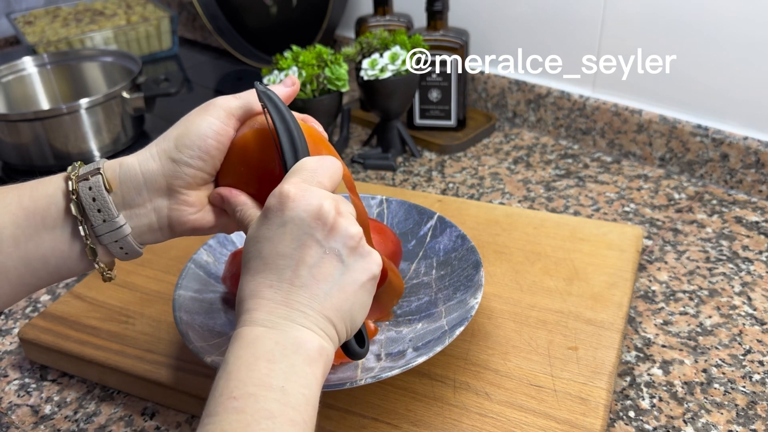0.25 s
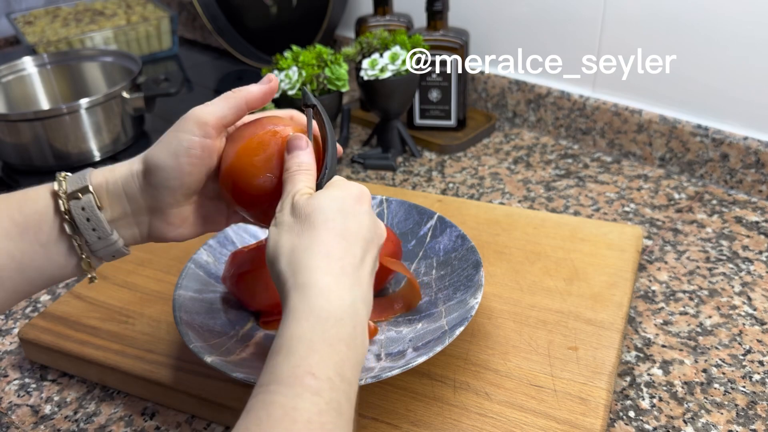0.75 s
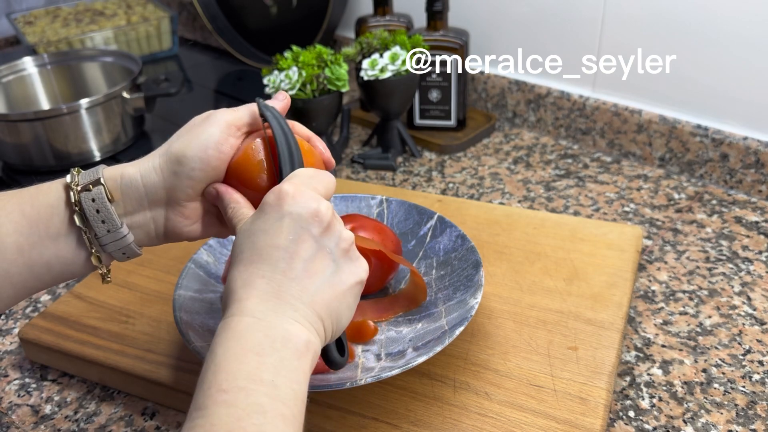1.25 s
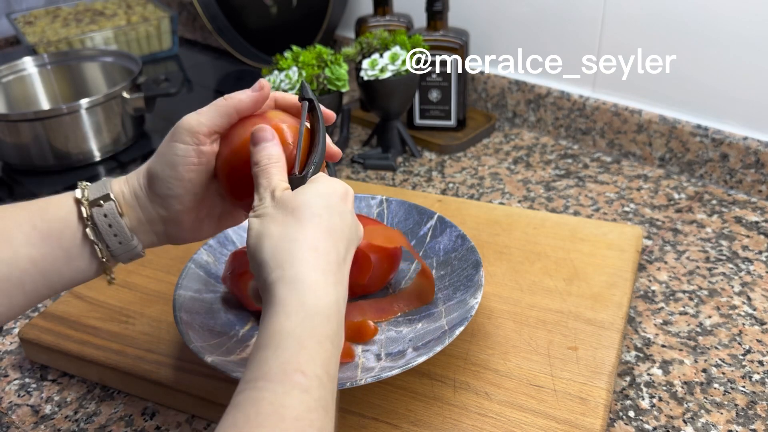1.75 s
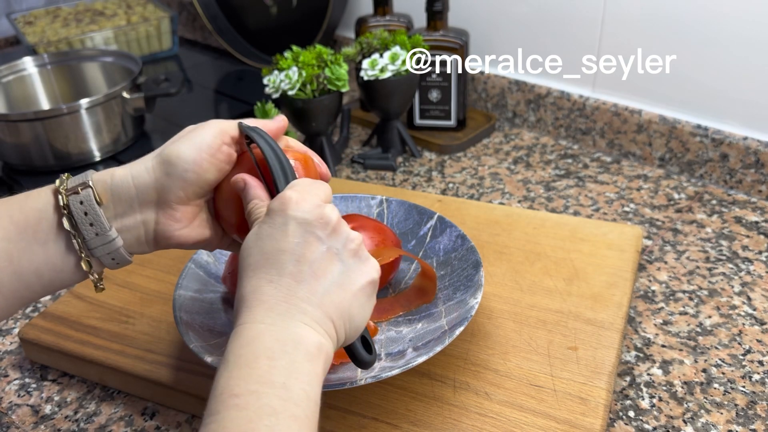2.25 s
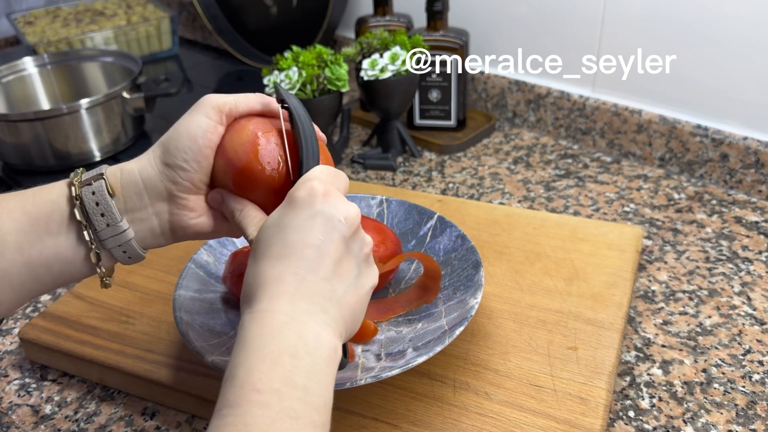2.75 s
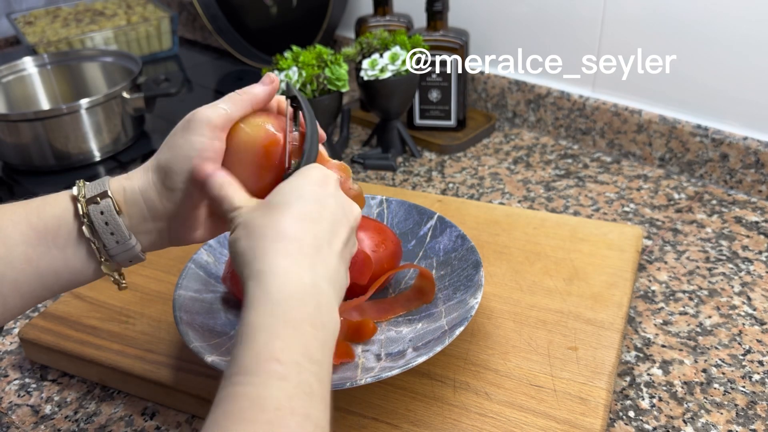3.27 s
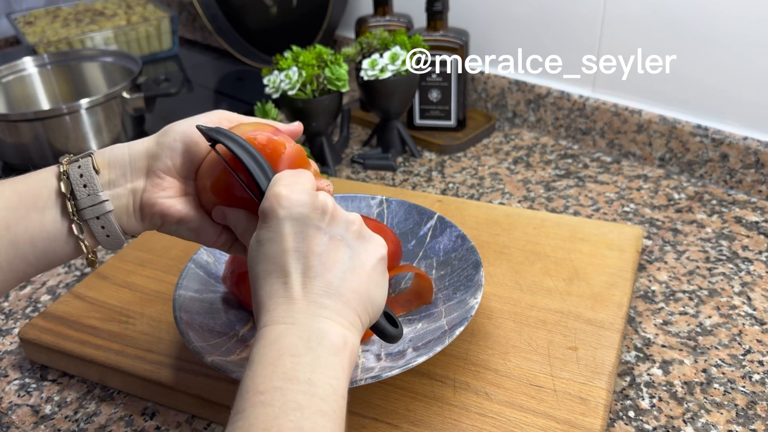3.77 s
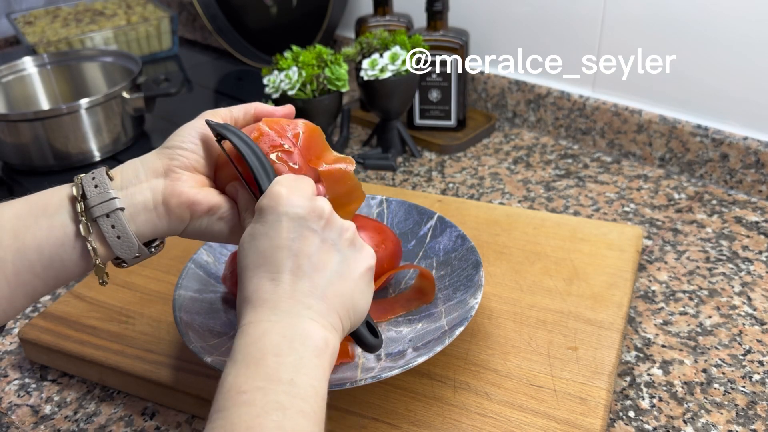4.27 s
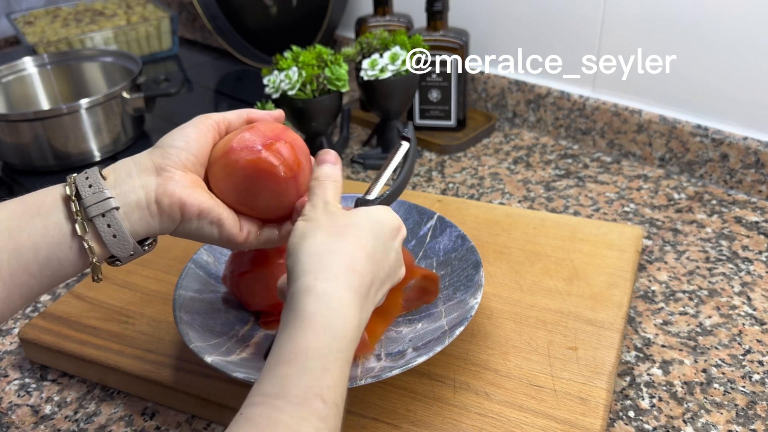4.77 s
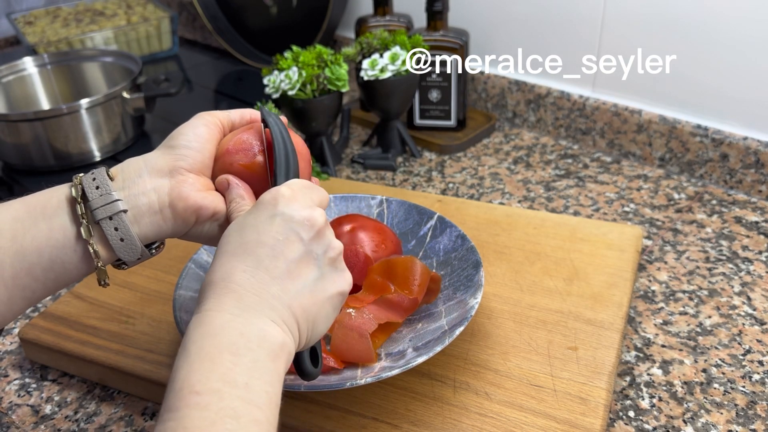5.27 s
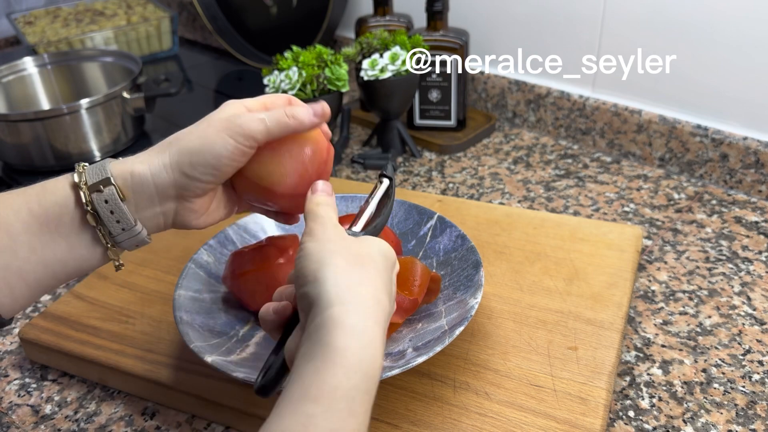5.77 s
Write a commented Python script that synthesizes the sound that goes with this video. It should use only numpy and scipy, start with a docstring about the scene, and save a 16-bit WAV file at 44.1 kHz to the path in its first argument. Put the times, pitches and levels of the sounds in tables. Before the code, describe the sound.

Close to the microphone in a small tiled kitchen, a peeler tears tomato skin in short, soft rasps with wet pops and thin squeaks. Its loose blade ticks lightly. Past the middle it slips off with one hard snap, and peel slaps onto a plate. A few more strokes follow, then something further off squeals and thuds dully. A low appliance hum and airy hiss continue underneath.

```python
"""A peeler tears the skin of a tomato, each stroke a dense run of tiny ruptures with wet pops and squeaks.
The swivel blade ticks in its holder and once snaps hard as it slips off the fruit; peel slaps the plate.
All this is close to a phone in a small tiled kitchen. Near the end something further off squeals and
thuds dully against a panel. Underneath sits a bed of appliance hum, air and a faint electrical whine."""
import sys
import numpy as np
from scipy import signal
from scipy.fft import rfft, irfft
from scipy.io import wavfile

SR = 44100
rng = np.random.default_rng(int(sys.argv[2]) if len(sys.argv) > 2 else 0)


def unload_audio(sound):
    """Save the sound as a 16-bit wav file, at the path given as the first command line argument."""
    columns = np.transpose(np.atleast_2d(sound))
    # keep every value between -1 and 1, then stretch to whole-number steps
    steps = np.round(np.clip(columns, -1, 1) * 32767)
    wavfile.write(sys.argv[1], SR, steps.astype(np.int16))


N = 265482
T = np.arange(N) / SR
FREQ = np.arange(N + 1) * SR / (2 * N)

# Table levels are trims ahead of the layer and mix gains.
# blade strokes: cut start t/s, dig-in/s, hold/s, rasp level/dB, flesh re rasp/dB, buzz re rasp/dB
STROKES = [ (0.456, 0.0054, 0.0037, -52, 2, -3), (0.495, 0.0031, 0.0079, -56, 3, 1.5),
           (1.143, 0.017, 0.012, -50.5, 1, -6.5), (1.161, .005, 0.009, -53, 3.5, -2.5),
           (1.195, .014, 0.014, -50.5, 0, -4), (1.22, .008, 0.017, -52.5, -5, -5.5),
           (1.270, 0.024, 0.011, -54.5, 3, -2.5), (1.340, .020, 0.1, -63, 0, -5),
           (1.45, 0.011, 0.012, -51.5, 0, -4.5), (2.041, 0.037, 0.043, -54, -2.5, -2.5),
           (2.173, 0.01, 0.0031, -46, -5.5, -6.5), (2.212, .009, 0.046, -59.5, 0, -2),
           (2.657, 0.0028, .004, -54, -5.5, -10), (2.682, 0.0026, 0.0044, -52.5, -8, -4),
           (2.776, 0.014, 0.017, -48, -1.5, -11), (2.807, .008, 0.016, -49, -3, -10),
           (2.835, .006, 0.013, -47, -3, -10), (2.857, .008, 0.02, -50.5, 0, -10),
           (2.886, 0.024, 0.02, -46, -2, -2.5), (2.942, .005, 0.012, -54.5, -13, -9),
           (3.595, .020, 0.11, -64, -2.5, -9), (3.708, 0.011, 0.019, -56.5, 1.5, -2.5),
           (3.744, 0.0044, 0.009, -57, 4.5, 0), (3.764, .008, 0.032, -60, 6, 2.5),
           (4.211, 0.0057, 0.01, -42, -8, -4.5), (4.237, 0.015, 0.02, -46, -2, -2.5),
           (4.476, 0.012, 0.027, -57.5, -10, -1.5), (5.047, 0.0023, 0.0087, -62, -25, 10.5),
           (5.228, 0.002, 0.0045, -50, 5, 0.5), (5.265, .012, 0.023, -60.5, 3, -5),
           (5.345, 0.015, 0.037, -44.5, -5.5, -1), ]
# bright rasp of tearing skin: f/Hz, level/dB
SKIN_EQ = [(1500, -48), (3200, -4), (4500, -2.5), (5400, 1.5), (6400, 6), (7400, 2), (8400, -7.5),
           (9700, -1), (11000, 1.5), (12200, -45), (15000, -21)]
# wet flesh under the blade: f/Hz, level/dB
FLESH_EQ = [(60, -34), (150, -47), (450, 10), (650, 3.5), (850, 5.5), (1000, 1), (1280, 4), (1750, -6.5),
            (2600, -56), (5000, -20)]
# blade squeaks on smooth skin: centre t/s, half length/s, f/Hz, glide/(Hz/s), level/dB
SQUEAKS = [(0.455, 0.0091, 6250, 0, -61), (0.5, 0.014, 5580, -6000, -55.5),
           (1.181, .05, 5650, -11000, -60.5), (1.278, 0.019, 4580, -3000, -57.5),
           (1.385, 0.074, 4430, 0, -64.5), (1.46, 0.013, 4380, 0, -48), (1.488, 0.013, 4560, 4000, -66),
           (2.074, 0.021, 6600, 0, -61), (2.2, 0.087, 7050, 0, -72), (2.861, 0.055, 4730, -4000, -63),
           (2.899, 0.025, 6000, -6000, -53), (3.645, 0.045, 6400, -4000, -72), (3.709, 0.016, 5800, 0, -63),
           (3.755, 0.035, 5350, 0, -66), (3.779, 0.037, 3710, -500, -59.5), (5.36, 0.022, 7640, 0, -51.5)]
# wet pops in the strokes, the plop of landing peel, the ping of one blade tick: t/s, f/Hz, level/dB
POPS = [(1.158, 1140, -38), (2.042, 2160, -50), (2.081, 2130, -43), (2.177, 1240, -42), (2.179, 2550, -43),
        (2.68, 3100, -41), (3.748, 1180, -49), (4.475, 3130, -47), (4.496, 2300, -45), (4.507, 2200, -36.5),
        (4.567, 500, -38), (4.568, 950, -34), (4.661, 3180, -32), (5.231, 2460, -35)]
# light blade ticks: t/s, level/dB, knock re tick/dB
TICKS = [(1.116, -50, -9), (1.429, -59, 5), (1.451, -55.5, 10), (1.802, -56.5, -1), (2.508, -49, -5.5),
         (2.6537, -45, -13), (2.678, -61, -7), (2.8935, -54, 2), (3.0003, -26, -38), (3.899, -47.5, -13.5),
         (4.2121, -48.5, 1), (4.532, -51, -18), (4.6615, -35.5, -11.5), (4.701, -53, 2), (4.743, -62, 4),
         (4.85, -58, 0.5), (4.891, -61, 1.5), (5.045, -40, -8), (5.061, -49, 0.5), (5.505, -53, -7),
         (5.576, -48, -5.5)]
# bright edge of a tick: f/Hz, level/dB
EDGE_EQ = [(2000, -38), (4500, -21.5), (6300, -19), (8000, 1), (10000, 5.5), (12000, -8), (15000, -17)]
# knock of the plastic holder: f/Hz, level/dB
HOLDER_EQ = [(100, -26), (500, 1), (1200, -13), (2300, -0.5), (3200, 2.5), (4500, -7.5), (6500, 1),
             (9000, -59)]
# the hard snap and its rebounds: t/s, level/dB
SNAPS = [(4.5425, -1.5), (4.5442, 1), (4.547, -21)]
# peeler resonances, the widest being the damped holder: f/Hz, width/Hz, level/dB
PEELER_MODES = [(456, 41, -15), (526, 44, -22), (557, 38, -7), (760, 51, 3.5), (927, 73, -2),
                (1150, 79, -13), (1247, 54, 2), (1331, 42, 0), (1630, 57, -19), (1800, 90, 0),
                (1990, 56, -1), (2100, 26, -17), (2463, 150, 21.5), (2438, 51, 7), (3240, 49, 2),
                (3465, 59, 0), (3620, 52, -4.5), (4236, 32, 0.5), (4340, 68, 0.5), (4500, 34, -13),
                (4860, 40, -2), (5224, 56, 0), (5930, 31, -8), (6400, 47, 5), (6240, 41, -12),
                (6820, 36, -10), (7500, 71, 0), (7600, 58, 4.5), (7670, 20, -8), (9060, 130, 5),
                (10440, 106, 2)]
# crack of the snap: f/Hz, level/dB
CRACK_EQ = [(40, -20), (100, 15), (180, 5.5), (300, 0), (600, -3), (1300, -2), (2500, -1), (4000, -9),
            (7000, -3), (8200, -37), (11000, -39), (15000, -35)]
# loose blade rattling in its holder: f/Hz, level/dB
RATTLE_EQ = [(250, -19), (650, 1), (950, -5), (1300, 2), (1600, -3), (1900, 1), (2500, -15), (3400, -9),
             (5500, -1), (8000, -34)]
# peel landing on the plate: t/s, level/dB
SLAPS = [(4.548, -30.5), (4.567, -27.5), (4.58, -39), (4.592, -45)]
# soft body of a slap: f/Hz, level/dB
SLAP_EQ = [(90, 3), (180, -10), (360, 7), (540, 12), (850, -12), (1500, -14), (3000, -48)]
# the fruit shifting in the fingers: centre t/s, half length/s, level/dB
GRIPS = [(0.756, 0.028, -55), (1.206, 0.084, -78), (1.977, 0.069, -50.5), (2.715, 0.046, -70),
         (4.994, 0.05, -66)]
# dull rub of the hand: f/Hz, level/dB
PALM_EQ = [(80, -33), (160, 7.5), (320, 8), (500, -7), (1200, -33), (2500, -31)]
# far thud and its rattle: t/s, knock level/dB, panel level/dB, panel tilt/(dB/octave)
THUDS = [(5.704, -6, 1.5, 0), (5.722, -1, -1, 4), (5.74, -10, -11, -11), (5.761, -7, -6, -1),
         (5.772, -10, -11, 2), (5.788, -5, -11, 1), (5.807, -12, -16, -8), (5.984, -18, -15.5, -7)]
# body of the thud: f/Hz, level/dB
THUD_EQ = [(70, -6), (140, 7), (300, -3), (450, -4), (630, 3), (830, -13), (1100, -3), (1500, -18),
           (2100, -37), (4000, -49)]
# resonances of the shaken panel: f/Hz, width/Hz, level/dB
PANEL_MODES = [(255, 25, 1.5), (308, 26, -4.5), (450, 33, -3), (587, 36, 1.5), (655, 41, -20),
               (920, 48, -5.5), (1085, 32, -10), (1296, 34, -11), (1500, 50, -16)]
# far squeals of something rubbing as it is pushed: centre t/s, half length/s, f/Hz, glide/(Hz/s), level/dB
SQUEALS = [(1.955, .04, 1120, 0, -29), (5.686, 0.018, 1115, 0, -17), (5.721, 0.015, 584, -2000, -1),
           (5.737, 0.017, 303, -500, 2.5)]
# appliance hum partials: f/Hz, level/dB
HUM_PARTIALS = [(43.5, -66), (62.5, -64.5), (90.3, -59), (100, -53.5), (109.8, -69), (150.8, -76),
                (243, -80.5), (299.8, -70)]
# steady kitchen air: f/Hz, level/dB
AIR_EQ = [(18, -35), (35, -12), (50, -10.5), (85, 3.5), (125, -7), (190, -7), (290, -12), (600, -13),
          (850, -19), (1100, -26), (1550, -25.5), (1900, -31), (5000, -33.5), (6300, -32.5), (8600, -40.5),
          (10200, -35.5), (12000, -39.5), (15000, -46.5)]
# first echoes off board, plate and wall: left delay/s, right delay/s, level/dB
ECHOES = [(.0011, 0.0052, -21), (.0031, 0.0011, -37), (.0046, .0058, -56)]
# reverb send of the snap and slaps: f/Hz, level/dB
HIT_SEND_EQ = [(200, 3), (420, -2.5), (800, 2), (1400, 4), (1950, 1.5), (2250, -5), (2500, -8), (2900, -5),
               (3500, 3.5), (5250, -2), (6400, -3), (8000, 3)]
# width of diffuse sound: f/Hz, side re mid/dB
DIFFUSE_WIDTH = [(60, -30), (110, -10.5), (200, -13), (370, -5), (670, 1.5), (1200, 2), (2200, -9),
                 (4000, -4.5), (6500, -36), (15000, 7)]
# pan of the hands: f/Hz, left minus right/dB
HANDS_PAN = [(200, 4), (400, -1), (700, -2), (1200, 2.5), (2300, -1), (4200, -1.5), (6500, -2), (9000, 0)]
# pan of the snap and slaps: f/Hz, left minus right/dB
HIT_PAN = [(200, -2), (370, -2), (670, 7), (1220, -4), (2240, -2), (4100, -8), (7500, -5)]
# pan of the room: f/Hz, left minus right/dB
ROOM_PAN = [(40, 5.5), (90, -2), (170, 1), (350, 1.3), (650, 2.5), (1200, -1), (2500, -4.5), (4500, -4),
            (6500, 0.5)]
# arrival lag of close sound: f/Hz, left behind right/rad
ARRIVAL_LAG = [(250, 0.024), (650, 1), (1000, 1), (1500, 0.24), (2600, 0.8), (4200, 0.93), (5800, 0)]
# left and right out of phase in the top treble, wide and hollow: f/Hz, left ahead of right/half turns
TREBLE_PHASE = [(8000, 0), (9000, .85), (10400, .85), (11800, 2), (13000, 2), (14500, 2.7)]


def peeling():
    """The blade tears the skin in grains; juice squelches in the flesh, the holder buzzes and crackles."""
    force = np.zeros((3, N))  # envelopes of skin, flesh and buzz
    for start, dig, hold, db, flesh_db, buzz_db in STROKES:
        levels = undb([[db], [db + flesh_db], [db + buzz_db]])
        force = np.maximum(force, levels * stroke_envelope(start, dig, hold))
    tear = ruptures(rate=3000, spread_db=2, smear=0.71) * undb(1.4 * wander(67))
    tear += undb(-10.5) * ruptures(rate=320, spread_db=-2, smear=0)
    fibres = grains(count=4200, low_hz=4170, high_hz=8340, cycles=5, spread_db=13)
    juice = grains(count=1900, low_hz=655, high_hz=1378, cycles=1.2, spread_db=6)
    crackle = grains(count=1500, low_hz=1883, high_hz=4230, cycles=6.7, spread_db=15.5)
    skin = unit(colour(tear + undb(-11) * fibres, SKIN_EQ))
    flesh = unit(unit(colour(tear, FLESH_EQ)) + undb(-2) * juice)
    holder = resonate(tear, 2130, 266) - undb(1) * resonate(tear, 3290, 470)
    holder += undb(-7.5) * resonate(tear, 4470, 640)
    holder = shape(holder, 1 / np.hypot(1, (FREQ / 5000) ** 3))
    blade = resonate(resonate(tear, 6200, 1600), 6200, 1600)
    buzz = unit(unit(holder + undb(-20) * blade) + undb(-5.5) * crackle)
    drag = undb(0.72 * wander(45.6))  # the skin resists unevenly
    return drag * np.sum(force * np.array([skin, flesh, buzz]), axis=0)


def stroke_envelope(start, dig, hold):
    """The blade bites, eases as it cuts and drops away as the skin lets go, inside a lighter slide."""
    bite_db, ease_db_per_s, release_db_per_s = 19, 34, 571
    before = np.maximum(start - T, 0) / dig
    after = np.maximum(T - start - hold, 0)
    cut_db = -bite_db * before - release_db_per_s * after
    slide_db = -12.5 - 4 * before - 152 * after  # quieter, with slower attack and release
    return undb(np.maximum(cut_db, slide_db) - ease_db_per_s * np.clip(T - start, 0, hold))


def ruptures(rate, spread_db, smear):
    """Random clicks of uneven size, as of bursting cells, over a smooth rub of noise."""
    sizes = undb(spread_db * np.minimum(rng.exponential(size=N), 4))
    clicks = (rng.random(N) < rate / SR) * sizes * rng.choice([-1, 1], N)
    return unit(clicks) + smear * noise()


def grains(count, low_hz, high_hz, cycles, spread_db):
    """Tiny bursts at random moments, each ringing a few cycles at its own pitch and strength."""
    when, pitch, size = rng.random((count, 3)).T[:, :, None]
    hz = low_hz * (high_hz / low_hz) ** pitch
    age = T[:400]
    life = np.exp(-hz * age / cycles)
    waves = undb(spread_db * size) * np.sqrt(hz) * life * (1 - life ** 2) * np.sin(2 * np.pi * hz * age)
    places = (when * N).astype(int) + np.arange(len(age))
    return unit(np.bincount(places.ravel(), waves.ravel(), N)[:N])


def squeaks():
    """Fast, uneven stick-slip sings in a narrow band that glides as the blade rounds the fruit."""
    slips = ruptures(rate=2900, spread_db=4.5, smear=0.077)
    band = unit(resonate(resonate(slips, 5000, 1000), 5000, 1000))
    baseband = signal.hilbert(band) * np.exp(-2j * np.pi * 5000 * T)  # down to 0 Hz, ready to retune
    return sum(undb(db + 5) * swell(s, half) * np.real(baseband * np.exp(1j * glide_phase(s, hz, glide)))
               for s, half, hz, glide, db in SQUEAKS)


def pops():
    """Short pitched pops, plops and a ping: each rings for a few cycles and rises a little in pitch."""
    cycles, rise, attack_s = 3.8, 0.021, 0.0002
    out = np.zeros(N)
    for s, hz, db in POPS:
        age = np.maximum(T - s, 0)
        life = np.exp(-hz * age / cycles)
        phase = 2 * np.pi * hz * age * (1 + rise * (1 - life))
        out += undb(db) * life * (1 - np.exp(-age / attack_s)) * np.sin(phase)
    return out


def blade_ticks():
    """The blade taps its stops: a bright edge and a duller knock of the holder."""
    edge = bursts([(s, db) for s, db, _ in TICKS], t60=0.0071)
    knock = bursts([(s, db + knock_db) for s, db, knock_db in TICKS], t60=0.025)
    return colour(edge, EDGE_EQ) + undb(4.5) * colour(knock, HOLDER_EQ)


def snap():
    """The peeler slips off and the blade slams home, ringing the whole tool, then rattles to rest."""
    start = SNAPS[0][0]
    rattle = colour(ruptures(rate=420, spread_db=6.5, smear=0.18) * decay(0.5, start), RATTLE_EQ)
    tool = ring(PEELER_MODES, start, waver_hz=16)
    crack = colour(bursts(SNAPS, t60=0.065), CRACK_EQ)
    return undb(-27.5) * tool + undb(-31) * crack + undb(-43.5) * rattle


def peel_drop():
    """Wet peel lands on the plate in a few quick slaps."""
    return colour(bursts(SLAPS, t60=0.033), SLAP_EQ)


def finger_rub():
    """Fingers rub dully on the fruit as it shifts."""
    return colour(noise(), PALM_EQ) * sum(undb(db) * swell(s, half) for s, half, db in GRIPS)


def far_thud():
    """Something further off squeals, groans and knocks unevenly against a panel, with a long room tail."""
    waver = 0.5 * wander(40)
    squeal = sum(undb(db) * swell(s, half) * np.sin(glide_phase(s, hz, glide) + waver)
                 for s, half, hz, glide, db in SQUEALS)
    panel = sum(undb(panel_db) * ring(PANEL_MODES, s, waver_hz=4, sharp=0.085, tilt_db=tilt)
                for s, _, panel_db, tilt in THUDS)
    knock = colour(bursts([row[:2] for row in THUDS], t60=0.055), THUD_EQ)
    thud = undb(-0.5) * panel + undb(0.5) * knock + squeal
    return undb(-42.5) * thud + undb(-49) * kitchen_reverb(thud, t60=0.73, treble_hz=2500, predelay_s=0.004)


def appliance_hum():
    """Motor and mains partials, each drifting slightly in level and phase."""
    hum = np.zeros(N)
    for hz, db in HUM_PARTIALS:
        gain = np.sqrt(2) * undb(db + 0.5 * wander(3.7))
        hum += gain * np.sin(2 * np.pi * (hz * T + rng.random()) + 0.25 * wander(0.41))
    return hum


def room_air():
    """Moving air: a steady hiss over a wavering rumble."""
    air = undb(-53) * unit(colour(diffuse_noise(), AIR_EQ))
    rumble = shape(air, 1 / (1 + (FREQ / 700) ** 2))
    return air + rumble * (undb(0.83 * wander(23)) - 1)


def electrical_whine():
    """A faint high tone and fizz, gated on thirty times a second."""
    gate = np.clip(2 * np.cos(2 * np.pi * 30 * (T + 0.006)) - 0.7, 0, 1)
    tone = np.sqrt(2) * np.sin(2 * np.pi * 7670 * T + 0.77 * wander(100))
    fizz = unit(resonate(resonate(noise(), 8050, 420), 7130, 420))
    return gate * (undb(-74.5) * tone + undb(-76.5) * fizz)


def worktop(x, pan):
    """Close sound placed between the microphones, plus first echoes that lose their treble."""
    echoes = sum(undb(db) * np.exp(-2j * np.pi * FREQ * np.array([[left], [right]]))
                 for left, right, db in ECHOES)
    direction = pan_gains(pan) * np.exp(-1j * split(ARRIVAL_LAG))
    return shape(x, direction * (1 + echoes / np.hypot(1, FREQ / 5000)))


def kitchen_reverb(x, t60, treble_hz, predelay_s):
    """Tiled walls return a diffuse tail with its top rolled off."""
    tail = shape(diffuse_noise() * decay(t60, predelay_s), 1 / np.hypot(1, FREQ / treble_hz))
    return signal.fftconvolve(x[None], tail / np.sqrt(np.sum(tail ** 2) / 2), axes=1)[:, :N]


def diffuse_noise():
    """Stereo noise from all sides: near mono in the bass, wide in the mids."""
    width = undb(curve(DIFFUSE_WIDTH))
    mid = shape(noise(), 1 / np.hypot(1, width))
    side = shape(noise(), width / np.hypot(1, width))
    return np.array([mid + side, mid - side])


def ring(modes, s, waver_hz, sharp=0, tilt_db=0):
    """Damped modes struck at s; loose contact makes each pitch waver, and a hard blow starts sharp."""
    attack_s, settle_s = 0.0025, 0.016
    t = T[:SR // 3]
    hz, width, db = np.transpose(modes)[:, :, None]
    sign = (-1) ** (np.arange(len(modes)) // 2)[:, None]  # modes swing towards or away from the listener
    waver = np.cumsum(rng.standard_normal((len(modes), len(t))), axis=1) * np.sqrt(2 * np.pi * waver_hz / SR)
    phase = 2 * np.pi * hz * (t + sharp * settle_s * (1 - np.exp(-t / settle_s))) + waver
    gain = sign * undb(db + tilt_db * np.log2(hz / np.median(hz)))
    sound = np.sum(gain * np.exp(-np.pi * width * t) * np.sin(phase), axis=0)
    return np.pad(sound * (1 - np.exp(-t / attack_s)), (int(s * SR), N))[:N]


def bursts(rows, t60):
    """A short noise hit for each (t/s, level/dB) row."""
    return noise() * sum(undb(db) * decay(t60, s) for s, db in rows)


def decay(t60, start):
    """An envelope that opens at start and falls 60 dB in t60 seconds."""
    return (T >= start) * np.exp(-np.log(1000) * np.maximum(T - start, 0) / t60)


def swell(s, half):
    """A smooth bump centred on s."""
    return np.exp(-((T - s) / half) ** 2)


def glide_phase(s, hz, glide):
    """Phase of a steady glide that passes through hz at time s."""
    return 2 * np.pi * (hz + glide * (T - s) / 2) * (T - s)


def wander(rate_hz):
    """Smooth random modulation at rms 1."""
    return unit(shape(noise(), np.exp(-(FREQ / rate_hz) ** 2)))


def noise():
    """White noise."""
    return rng.standard_normal(N)


def resonate(x, hz, width):
    """One resonance, gain 1 at its centre."""
    return shape(x, 1j * FREQ * width / (hz ** 2 - FREQ ** 2 + 1j * FREQ * width))


def colour(x, eq):
    """Apply an EQ curve, keeping the power of white noise."""
    return shape(x, unit(undb(curve(eq))))


def shape(x, gain):
    """Apply a gain per frequency."""
    return irfft(rfft(x, 2 * N) * gain)[..., :N]


def pan_gains(pan):
    """Left and right gains from a pan curve."""
    return undb(split(pan))


def split(points):
    """Share a difference curve: plus half to the left, minus half to the right."""
    return np.array([[1], [-1]]) * curve(points) / 2


def curve(points):
    """Join (f/Hz, value) points on a log-frequency axis."""
    hz, value = np.transpose(points)
    return np.interp(np.log(FREQ + 1), np.log(hz), value)


def unit(x):
    """Scale to rms 1."""
    return x / np.sqrt(np.mean(x ** 2))


def undb(db):
    """Decibels to gain."""
    return 10 ** (np.asarray(db) / 20)


def scene():
    """The mix: peeling and hits up close; their reverb, the far thud and the bed behind."""
    hands = peeling() + squeaks() + pops() + finger_rub() + blade_ticks()
    hits = snap() + peel_drop()
    close = worktop(hands, HANDS_PAN) + worktop(hits, HIT_PAN)
    hit_send = shape(hits, undb(curve(HIT_SEND_EQ)))
    walls = undb(-16) * kitchen_reverb(hands, t60=0.26, treble_hz=3430, predelay_s=0.003)
    walls += undb(-15.5) * kitchen_reverb(hit_send, t60=0.44, treble_hz=4970, predelay_s=0.0097)
    room = walls + far_thud() + appliance_hum() + room_air() + electrical_whine()
    return undb(-2.5) * close + shape(room, pan_gains(ROOM_PAN))


def record(dry):
    """Left and right drift out of phase in the top treble, wide and hollow; the very top is cut."""
    top_hz = 14400
    widened = shape(dry, np.exp(1j * np.pi * split(TREBLE_PHASE)))
    return signal.sosfilt(signal.ellip(8, 0.2, 70, top_hz, fs=SR, output="sos"), widened)


dry = scene()
out = record(dry)
unload_audio(out)
```